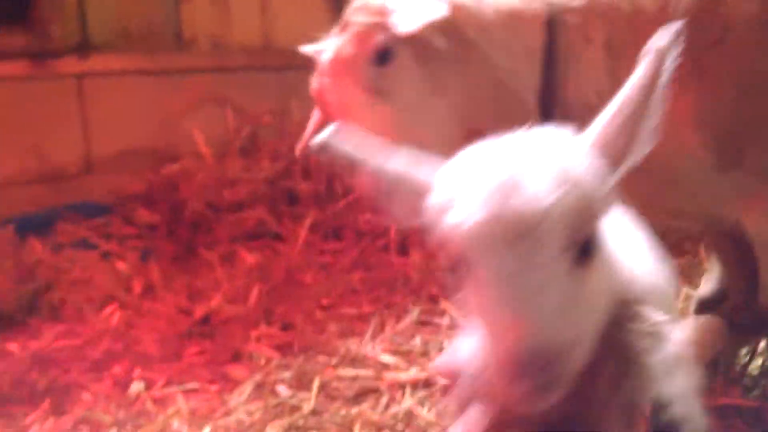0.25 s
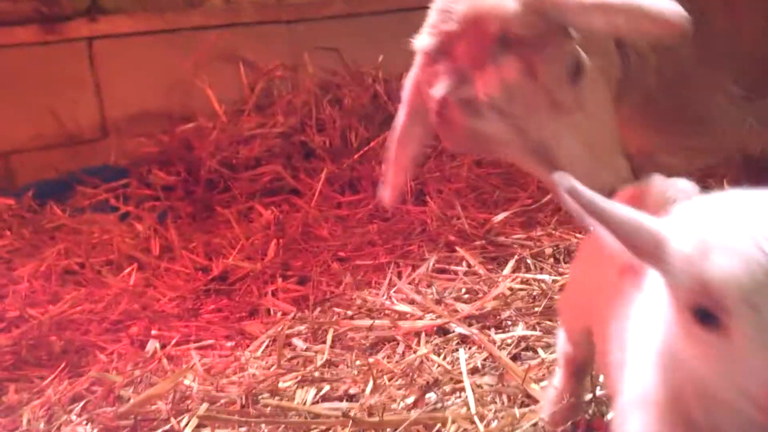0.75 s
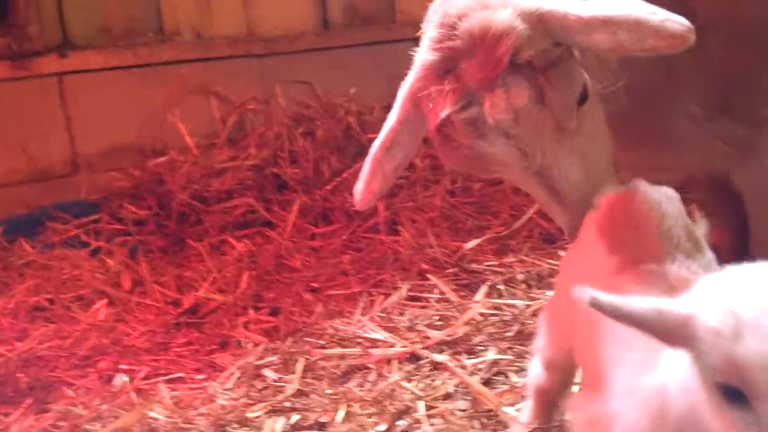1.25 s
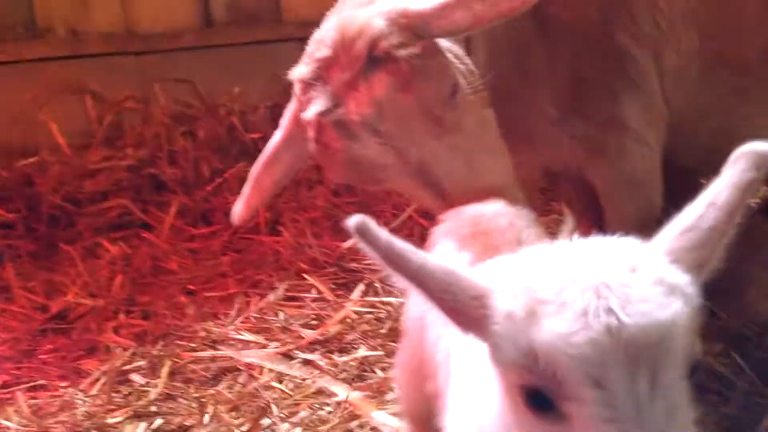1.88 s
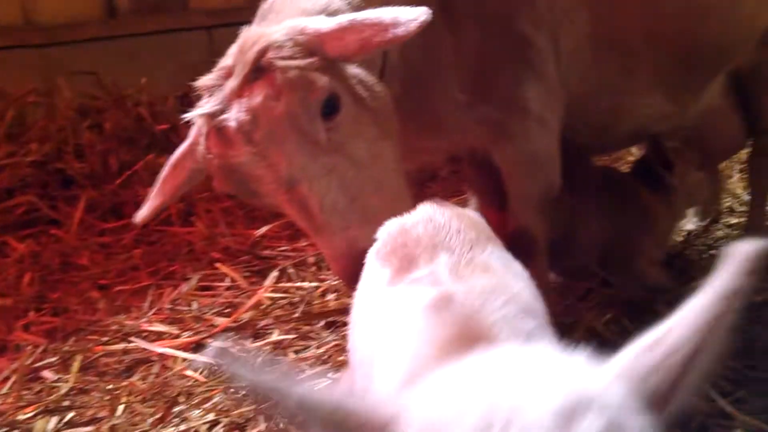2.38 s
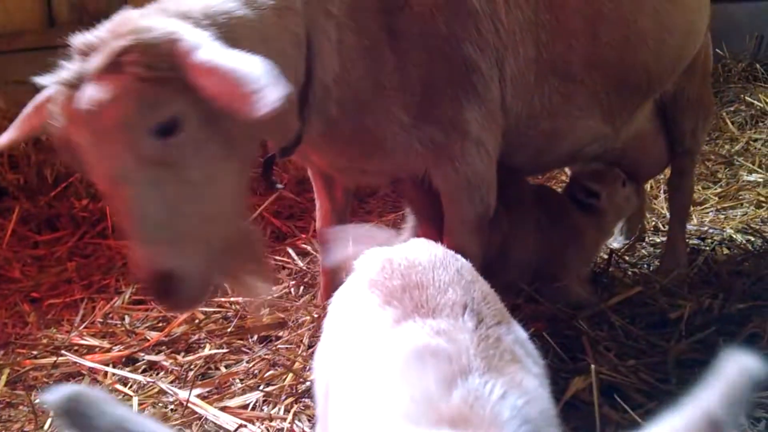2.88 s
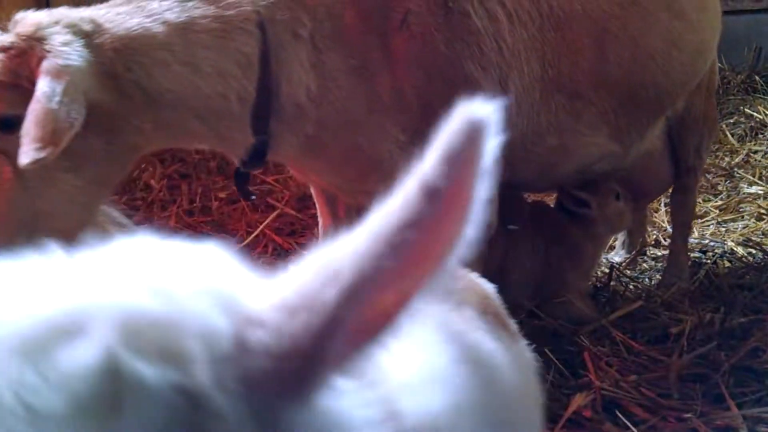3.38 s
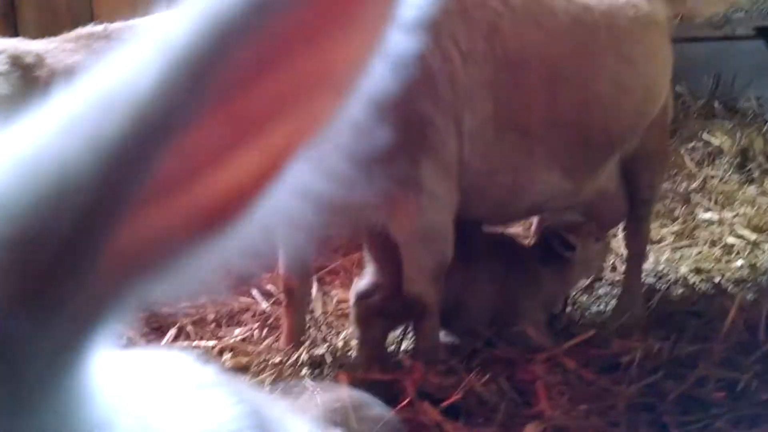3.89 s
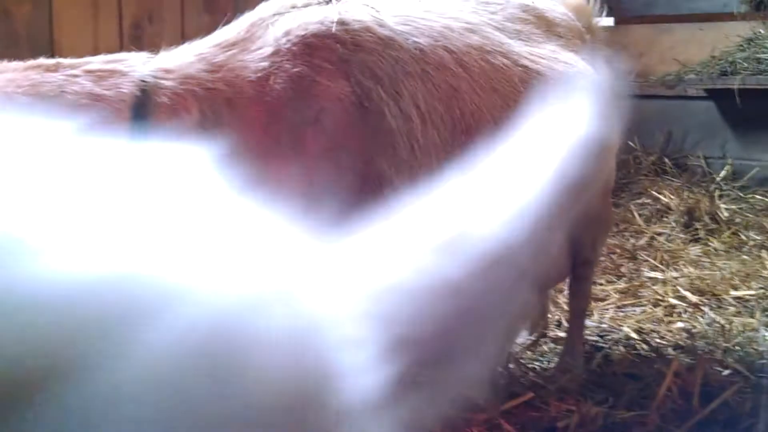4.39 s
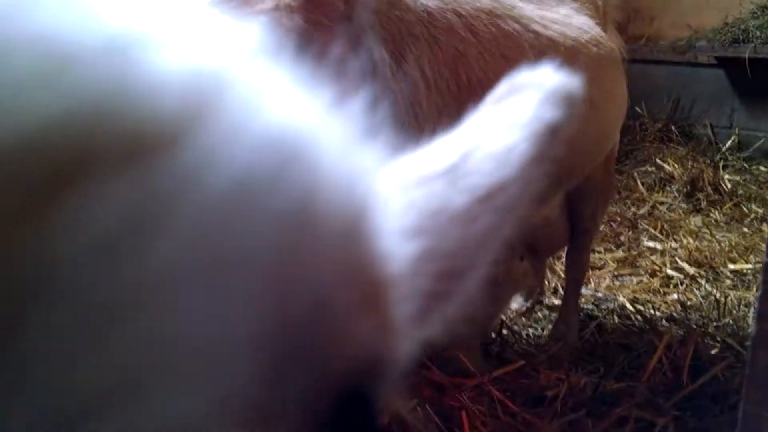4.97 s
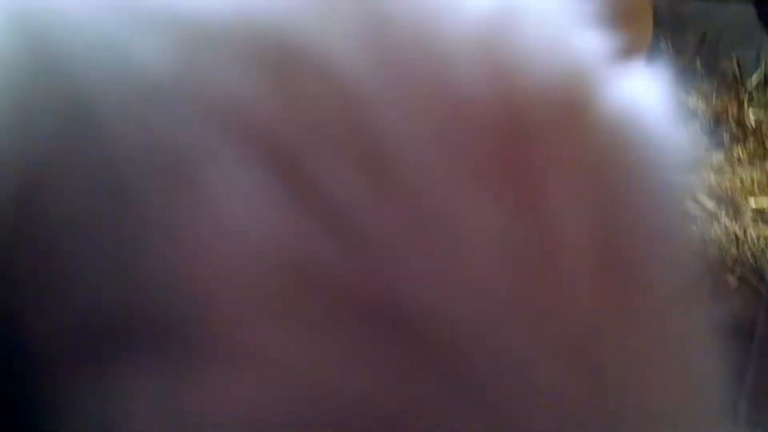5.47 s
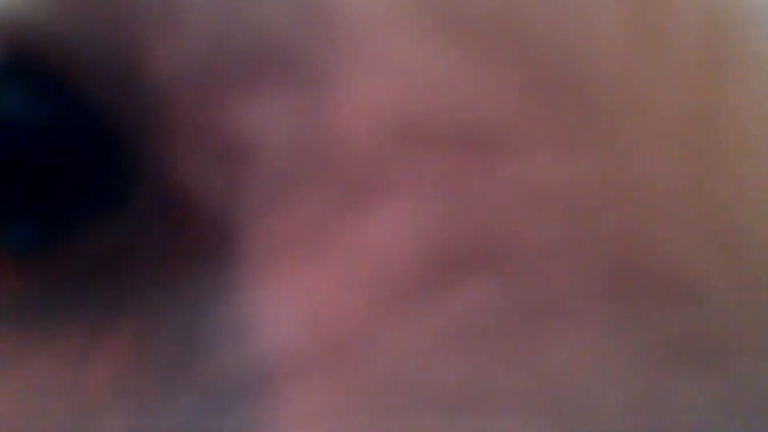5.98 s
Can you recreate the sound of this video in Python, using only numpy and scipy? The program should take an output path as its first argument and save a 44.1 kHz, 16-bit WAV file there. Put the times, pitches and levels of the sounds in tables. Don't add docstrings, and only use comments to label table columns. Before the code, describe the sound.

Close stereo sound in a wooden barn pen with short, sparse echoes. From 0 to 1.3 s five goat kid bleats come quickly, each about 0.2 to 0.3 s, nasal and shaky, near 500 Hz, as straw rustles strongly around 0.5 s and stalks snap. At 1.3 s the doe gives a low creaky call with a dull bump, then a thin creak and a soft fading call until 2 s. A longer bleat starts at 1.9 s; others follow at 2.5, 2.8 and 3.1 s amid busy crackling straw. A sharp dry board knock lands at 3.5 s, then a swelling bleat, and the last kid cry at 4 s with bright snaps and a thud at 4.2. A quieter gap follows. From 4.7 s faint creaks lead into the doe's long swelling hoarse call, then breathy, raspy calls at 5.4, 5.6 and 5.95 s, with sparse snaps and soft bumps.

```python
import sys
import numpy as np
from scipy import signal
from scipy.fft import rfft, irfft, next_fast_len
from scipy.io import wavfile
from scipy.ndimage import uniform_filter1d

SR = 44100
rng = np.random.default_rng(int(sys.argv[2]) if len(sys.argv) > 2 else 0)


def transcribe(u):
    v = np.clip(np.atleast_2d(u).T, -1, 1)
    q = np.round(v * 32767).astype(np.int16)
    wavfile.write(sys.argv[1], SR, q)


def rack_gain(trim_db):
    fader = np.asarray(trim_db, float)
    return 10 ** (fader / 20)


N = 275447
SPACING = 17.593


def evened(x):
    return x / np.sqrt(np.mean(x ** 2) + 1e-20)


def chance(length):
    return rng.standard_normal(max(length, SR))[:length]


def wander(length, hz):
    pole = np.exp(-2 * np.pi * hz / SR)
    return evened(signal.lfilter([1], [1, -pole], chance(length)))


def read(points, hz, column=1):
    table = np.transpose(points)
    return np.interp(np.log(hz + 1), np.log(table[0] + 1), table[column])


def coloured(x, points):
    size = next_fast_len(N)
    gain = rack_gain(read(points, np.fft.rfftfreq(size, 1 / SR)))
    return evened(irfft(rfft(x, size) * gain, size)[..., :N])


def delayed(x, samples):
    size = next_fast_len(N)
    phase = np.exp(-2j * np.pi * np.fft.rfftfreq(size) * samples)
    return irfft(rfft(x, size) * phase, size)[:N]


def resonate(x, hz, width):
    turn = np.exp(2j * np.pi * np.cumsum(hz * np.ones(x.shape), axis=0) / SR)
    r = np.exp(-np.pi * width / SR)
    smooth = signal.lfilter([(1 - r) ** 2], [1, -2 * r, r * r], x / turn, axis=0)
    return 2 * (turn * smooth).real


def add(mix, s, sound):
    part = mix[round(s * SR):][:len(sound)]
    part += sound[:len(part)]


def stirred(events, bed_db):
    t = np.arange(0, N + 64, 64) / SR
    power = 0
    for s, db, rise, fall in events:
        power = power + rack_gain(2 * db - 20 * np.maximum((s - t) / rise, (t - s) / fall))
    return np.sqrt(np.interp(np.arange(N) / SR, t, power) + rack_gain(2 * bed_db))


def moments(start, swell, hold, fade):
    return start + np.cumsum([0, .012, swell, hold, fade])


def spread(rows):
    s, *columns = np.transpose(rows)
    t = np.arange(s[0], s[-1], 1 / SR)
    return t, [np.interp(t, s, c) for c in columns]


def rumble():
    noise = rng.standard_normal((2, N)).T
    return rack_gain(-49.5) * evened(resonate(noise, [[35.]], 120).T)


def shuffle():
    # t/s, level/dB, rise/s, fall/s
    shifts = [
        (.2, -54.5, 0.65, 0.63),
        (1.28, -49.5, 0.15, 0.39),
        (2.5, -48, 0.52, 0.18),
        (3.28, -52.5, 0.58, .05),
        (3.76, -49.5, 0.18, 0.25),
        (4.21, -51, 0.095, 0.17),
        (5.18, -56, .1, 0.1),
        (5.5, -61, 0.091, .4),
        (6.05, -47.5, 0.35, 0.14),
        (6.21, -48, 0.054, 0.033),
    ]
    # f/Hz, level/dB per Hz
    hum = [(25, -27), (60, -11), (150, -4), (300, -2.5), (500, -7), (1200, -17), (4000, -32.5),
           (15000, -102)]
    own, shared = rng.standard_normal((2, N)), rng.standard_normal(N)
    still_air_db = -67
    return rack_gain(15) * stirred(shifts, still_air_db) * coloured(own + 3.7 * shared, hum)


def straw():
    # t/s, level/dB, rise/s, fall/s
    rustles = [(.05, -39.5, 0.14, 0.34), (.29, -38.5, 0.044, 0.13), (.43, -30, 0.063, 0.11),
               (.52, -29, 0.072, 0.036), (.89, -33, .04, 0.033), (1.26, -33.5, 0.15, 0.081),
               (1.37, -37.5, 0.044, 0.12), (1.7, -42, 0.014, 0.12), (1.9, -33.5, 0.17, .15),
               (2.05, -43, 0.045, 0.031), (2.23, -36, 0.095, 0.017), (2.33, -34, 0.11, 0.25),
               (2.49, -35.5, 0.084, 0.033), (2.67, -33, 0.11, 0.014), (2.77, -28, 0.086, 0.11),
               (3.04, -32, 0.057, 0.03), (3.25, -37.5, 0.25, 0.16), (3.33, -36, 0.11, 0.027),
               (3.62, -38, 0.038, .08), (3.69, -37, 0.037, 0.039), (3.88, -33, .13, .07),
               (4.07, -34.5, 0.039, 0.024), (4.21, -36, 0.11, 0.071), (4.36, -39, 0.056, 0.045),
               (4.45, -42.5, 0.084, 0.014), (5.43, -40, 0.047, .08), (5.57, -38, 0.088, 0.11),
               (6.04, -46.5, 0.064, .1), (6.25, -45, 0.13, 0.072)]
    # t/s, level/dB
    settling = [(0, -46), (4.3, -57), (4.55, -51), (4.85, -59), (5.22, -52.5), (5.36, -56), (5.8, -53),
                (6.25, -47.5)]
    # f/Hz, level/dB per Hz
    colour = [(200, -9.5), (600, -2), (1500, -7.5), (4000, -4.5), (8000, -1), (12000, -0.5), (15000, 1)]
    bed_db = np.interp(np.arange(N) / SR, *np.transpose(settling))
    struck = rng.random((2, N)) < 2500 / SR
    cracks = rack_gain(3.3 * np.minimum(rng.exponential(1, (2, N)), 5)) * struck
    grit = .5 * evened(cracks * rng.standard_normal((2, N))) + rng.standard_normal((2, N))
    flicker = rack_gain(1.3 * wander(N, 19))
    return rack_gain(9.5) * stirred(rustles, bed_db) * flicker * coloured(grit, colour)


def snaps():
    # t/s, peak level/dB, centre f/Hz
    breaks = [(0.7322, -28, 14500), (0.7921, -31, 9540), (0.8709, -21.5, 12700), (0.984, -21.5, 14000),
              (1.0455, -31, 11750), (1.6541, -44, 11260), (1.704, -21.5, 11100), (1.861, -23, 9600),
              (2.002, -23, 11900), (3.1931, -33, 13400), (3.5838, -33, 11800), (4.053, -20, 14600),
              (4.155, -20, 6360), (4.3575, -22.5, 8900), (4.515, -44, 13800), (4.58, -27, 14400),
              (4.6638, -37, 13800), (4.6892, -34, 12100), (4.8239, -44, 11800), (4.8858, -50, 5600),
              (5.3642, -38, 15000), (5.388, -30, 12600), (5.5552, -19, 12500), (5.788, -28, 9900),
              (5.8975, -30, 14400)]
    out, t = np.zeros((2, N)), np.arange(300) / SR
    bursts = rng.standard_normal((len(breaks), 2, 300)) * np.exp(-t / 0.002)
    for (s, db, hz), pair in zip(breaks, bursts):
        for channel, burst in zip(out, pair):
            add(channel, s, rack_gain(db + 6.0) * resonate(burst, np.clip(hz, 4000, 15000), 5700))
    return out


def bumps():
    # t/s, peak level/dB, ring f/Hz, t60/s
    blows = [(1.256, -29, 196, 0.71), (2.93, -37, 175, 0.3), (3.1, -35, 126, 0.4), (3.27, -33.5, 161, 0.3),
             (3.482, -11.5, 670, 0.0033), (3.483, -35, 253, 0.15), (3.814, -24, 294, 0.032),
             (4.05, -33.5, 254.4, 0.34), (4.213, -19, 106, 0.041), (5.418, -32, 214, 0.2),
             (5.923, -31, 153, .12)]
    out, t = np.zeros(N), np.arange(8000) / SR
    for s, db, hz, t60 in blows:
        add(out, s, -rack_gain(db - 60 * t / t60) * np.sin(2 * np.pi * hz * t))
    return out


def barn(x):
    # f/Hz, t60/s
    decay = [(200, 0.11), (1000, 0.34), (4000, 0.32), (12000, 0.016)]
    taps = np.zeros((2, SR // 2))
    jitter = rng.integers(0, 20, (2, (SR // 2 - 201) // 20))
    at = np.arange(200, SR // 2 - 20, 20) + jitter
    np.put_along_axis(taps, at, rng.choice([-1., 1.], at.shape), 1)
    hz, t, z = signal.stft(taps, SR, nperseg=256)
    alike = np.sinc(2 * hz * SPACING / SR)[:, None]
    z = np.array([z[0], alike * z[0] + np.sqrt(1 - alike ** 2) * z[1]])
    fading = rack_gain(-60 * t / read(decay, hz)[:, None])
    tail = signal.istft(z * fading, SR, nperseg=256)[1]
    return signal.fftconvolve(x[None], tail / np.linalg.norm(tail[0]), axes=1)[:, :N]


def doe_gesture(timing, voice):
    *times, db = timing
    first_hz, last_hz, jaw_hz, jaw_db, hoarse = voice
    s = moments(*times)
    onset_db = -3 - 36 * times[1]
    fade_db = -11
    effort_db = db + np.array([onset_db + fade_db, onset_db, 0, 0, fade_db])
    tongue_hz = np.interp(s, s[[0, -1]], [first_hz, last_hz])
    jaw_hz = jaw_hz - 900 * (s - s[0]) * (hoarse < .2)
    return np.transpose([s, effort_db, tongue_hz, jaw_hz, np.full(5, hoarse), np.full(5, jaw_db)])


def doe_call(rows):
    # f/Hz, width/Hz, level/dB
    throat_modes = [(865, 400, -1), (1440, 320, -19.5), (1716, 270, -11.5), (2890, 670, -18.5),
                    (3950, 710, -27), (5070, 330, -25.5), (6370, 850, -30)]
    t, (effort_db, tongue_hz, jaw_hz, hoarse, jaw_db) = spread(rows)
    hoarse = np.clip(hoarse, 0, 1)
    turns = np.cumsum(88 * np.abs(1 + .12 * wander(len(t), 25))) / SR
    beats = np.diff(np.floor(turns), prepend=0) * rack_gain(2.5 * chance(len(t)))
    puffs = (.3 + np.exp(-(turns % 1) / .35)) * chance(len(t))
    drive = (1 - hoarse) * evened(beats) + hoarse * evened(puffs)
    drive = signal.sosfilt(signal.butter(4, 340, "high", fs=SR, output="sos"), drive)
    shift = (uniform_filter1d(tongue_hz, size=4000) / 1070) ** .8
    breathy = hoarse.mean()
    others = 0
    for k, (f, w, db) in enumerate(throat_modes):
        gain = (-1) ** k * rack_gain(db) / shift ** (3.0 * (k > 3))
        others = others + gain * resonate(drive, f * (shift if k > 2 else 1), w)
    width = 60 + 320 * breathy
    tongue = resonate(drive, tongue_hz, width)
    jaw = rack_gain(jaw_db - 0.5) * resonate(drive, jaw_hz, 1.22 * width)
    throat = 1.9 * breathy * others + tongue + jaw
    return t[0], rack_gain(effort_db - 2.5) * evened(throat) * signal.windows.tukey(len(t), .05)


def doe():
    # t/s, swell/s, hold/s, fade/s, effort level/dB
    calls = [
        (1.3, 0.18, 0.043, 0.095, -25),
        (1.693, .015, .015, 0.031, -30.5),
        (1.763, 0.022, 0.09, 0.15, -28),
        (4.727, 0.011, 0.086, .04, -45.5),
        (4.758, .02, .07, 0.031, -44),
        (4.861, 0.26, .16, .07, -24.5),
        (5.401, 0.055, 0.14, .06, -26),
        (5.637, 0.14, 0.085, 0.1, -25),
        (5.95, 0.053, 0.13, 0.15, -24),
    ]
    # first tongue f/Hz, last tongue f/Hz, jaw f/Hz, jaw level/dB, hoarseness/0-1
    voices = [(1060, 958, 588, -7.5, 0.19), (930, 1000, 563, -6.5, 0.18), (990, 1050, 575, -7.5, .25),
              (1279, 1350, 746, 0, 0.17), (946, 656, 640, -14, 0.06), (998, 1030, 550, 1, 0.45),
              (1046, 1075, 600, 2, 0.66), (1247, 1190, 627, -2.5, 0.4), (1236, 1194, 662, -7.5, 0.42)]
    out = np.zeros(N)
    for timing, voice in zip(calls, voices):
        add(out, *doe_call(doe_gesture(timing, voice)))
    return out


def kid_gesture(timing, voice):
    *times, db = timing
    first_hz, top_hz, chest_db, uneven, hoarse = voice
    effort_db = db + np.array([-35, -4.5, 0, -1.5, -35])
    swollen_hz = first_hz + .8 * (top_hz - first_hz)
    hz = [first_hz, first_hz, swollen_hz, top_hz, top_hz * (1 - 0.035)]
    steady = [np.full(5, value) for value in (hoarse, uneven, chest_db)]
    return np.transpose([moments(*times), effort_db, hz, *steady])


def bleat(rows):
    # f/Hz, width/Hz, level/dB
    throat_modes = [(744, 190, -12), (1084, 398, 9.5), (1210, 35, -21), (1466, 56, -8.5), (1935, 300, -5.5),
                    (2688, 58, -3), (3010, 1120, -12), (4160, 510, -17.5)]
    t, (effort_db, hz, hoarse, uneven, chest_db) = spread(rows)
    hoarse, hz = np.clip(hoarse, 0, 1), uniform_filter1d(hz, size=1300)
    hz = hz * (1 + .014 * evened(uniform_filter1d(wander(len(t), 12), size=900)))
    effort_db = effort_db + 2 * np.cos(2 * np.pi * 12.95 * (t - t[np.argmax(effort_db)]))
    chest_db = chest_db - np.clip(0.5 * (490 - hz), 0, 9)
    turns = np.cumsum(hz * (1 + .035 * hoarse * wander(len(t), 60))) / SR
    folds = evened(sum(np.cos(2 * np.pi * k * turns) for k in range(2, 10)))
    folds *= 1 + uneven * np.cos(np.pi * turns)
    puffs = (0.59 + np.exp(-(turns % 1) / 0.24)) * chance(len(t))
    shake = evened(uniform_filter1d(wander(len(t), 51), size=300))
    quaver = rack_gain(4.47 * np.tanh(shake))
    drive = (1 - hoarse) * folds + 2.9 * hoarse * evened(puffs)
    mouth = (hz / 500) ** .6
    throat = 0
    for k, (f, w, db) in enumerate(throat_modes):
        throat = throat + (-1) ** k * rack_gain(db) * resonate(drive, f * mouth, w)
    throat /= np.sqrt(uniform_filter1d(throat ** 2, size=2000) + 1e-9)
    chest = np.sin(2 * np.pi * turns) + .8 * resonate(drive, hz, 160)
    voice = quaver * throat + rack_gain(chest_db - 3.5) * np.sqrt(quaver) * chest
    return t[0], rack_gain(effort_db + 2.0) * voice * signal.windows.tukey(len(t), .08)


def kids():
    # t/s, swell/s, hold/s, fade/s, effort level/dB
    cries = [(0.037, 0.038, 0.07, .09, -25.5), (0.277, 0.064, 0.021, 0.061, -26.5),
             (0.494, .06, 0.026, .08, -28.5), (0.749, 0.066, 0.015, 0.17, -26.5),
             (1.091, 0.075, .13, 0.061, -27.5), (1.928, .2, .25, .08, -28), (2.468, .07, 0.067, 0.1, -25.5),
             (2.782, 0.065, 0.019, .22, -25.5), (3.12, .07, 0.015, 0.058, -27),
             (3.557, .17, .13, 0.045, -28), (4, 0.045, 0.13, 0.11, -25.5)]
    # first f/Hz, top f/Hz, fundamental level/dB, strong-weak pulsing/0-1, hoarseness/0-1
    voices = [(461.7, 500, 3.5, 0, 0.23), (490.4, 500, -1.5, 0.24, .36), (467, 497, -1.5, 0.14, 0.34),
              (459, 472, 2.5, 0.22, 0.3), (463, 480, -5, 0, .34), (417.7, 510, 4.5, 0.29, .28),
              (526, 490, -0.5, 0.35, .33), (471, 500, 0.5, 0.32, 0.35), (472, 495, 3.5, 0.65, 0.42),
              (432, 503, 1.5, 0.4, .3), (495, 500, 0, .6, 0.44)]
    out = np.zeros(N)
    for timing, voice in zip(cries, voices):
        add(out, *bleat(kid_gesture(timing, voice)))
    return out


def scene():
    kid_voices, doe_voice = kids(), doe()
    near = kid_voices + bumps()
    late = delayed(near, 5) + delayed(doe_voice, 6.5)
    direct = np.array([rack_gain(0.8) * late, near + doe_voice])
    voices = rack_gain(-1.5) * kid_voices + rack_gain(.5) * doe_voice
    sway = 2 * np.pi * 1.3 * np.arange(N) / SR
    echoes = barn(voices * np.cos(sway)) + barn(voices * np.sin(sway))
    return direct + echoes + straw() + snaps() + shuffle() + rumble()


def roll_off(x):
    return signal.sosfilt(signal.butter(12, 16690, fs=SR, output="sos"), x)


def record(dry):
    # f/Hz, left/0-1, right/0-1, left trim level/dB
    aim = [(100, 0.59, 0.65, -0.5), (393, 0.9, 0.97, -1), (1350, 0.62, 0.91, 1.5), (2680, 0.38, 0.89, 2.5),
           (5050, 0.55, 0.36, 2), (8250, 0.19, 0.079, 1.2), (15000, 0.14, 0.05, 2.5)]
    hz = np.fft.rfftfreq(N, 1 / SR)
    share = np.clip([read(aim, hz, column=1), read(aim, hz, column=2)], 0, 1)
    spectrum = rfft(dry)
    aimed = spectrum - share * np.exp(-2j * np.pi * hz * SPACING / SR) * spectrum[::-1]
    aimed[0] *= rack_gain(read(aim, hz, column=3))
    aimed *= np.clip((15560 - hz) / 150, 0, 1) / 2
    return roll_off(irfft(aimed, N))


dry = scene()
out = record(dry)
transcribe(out)
```